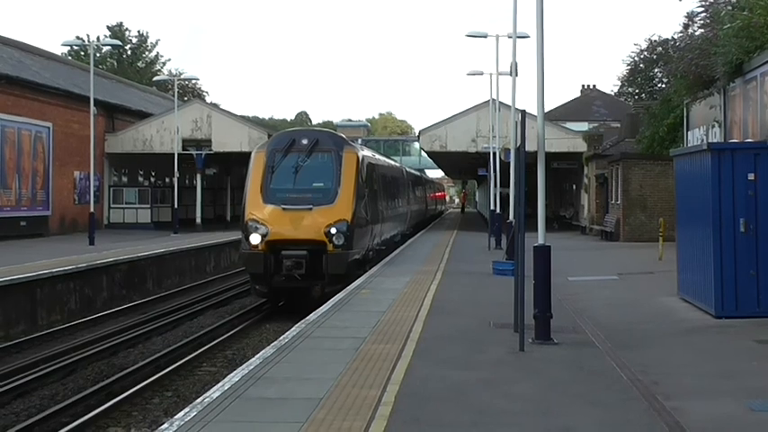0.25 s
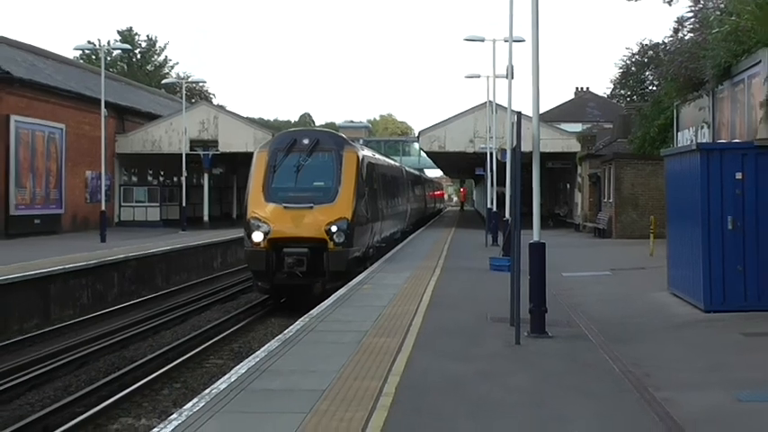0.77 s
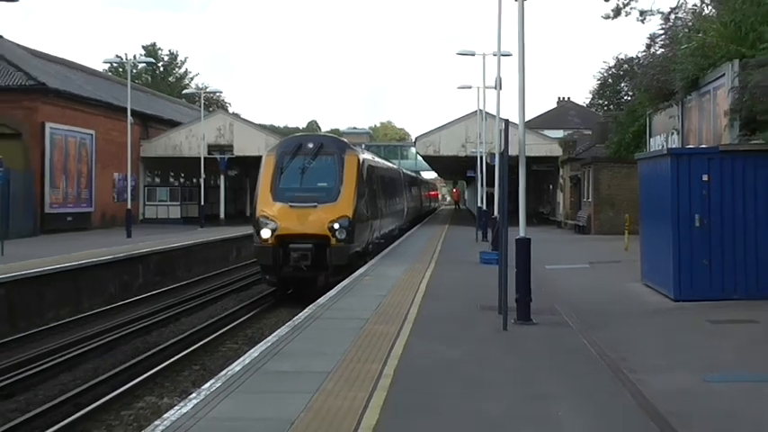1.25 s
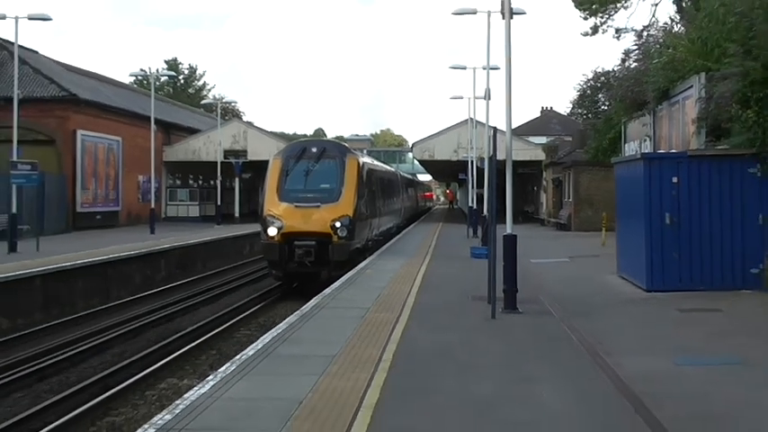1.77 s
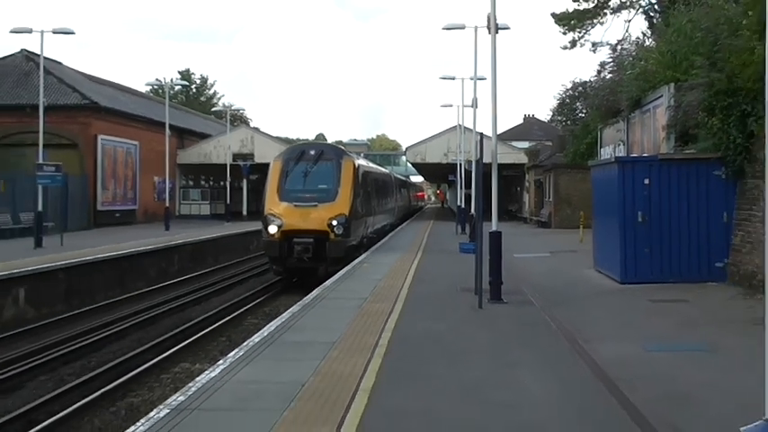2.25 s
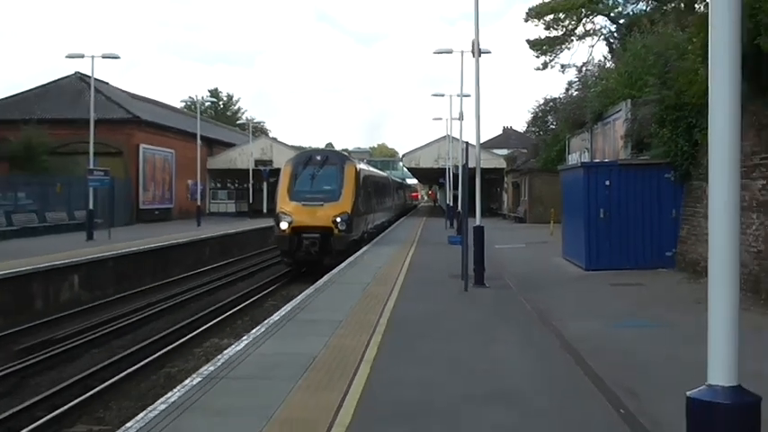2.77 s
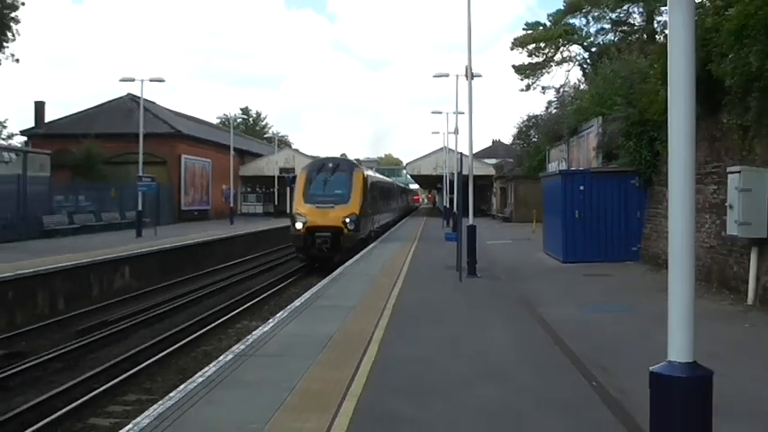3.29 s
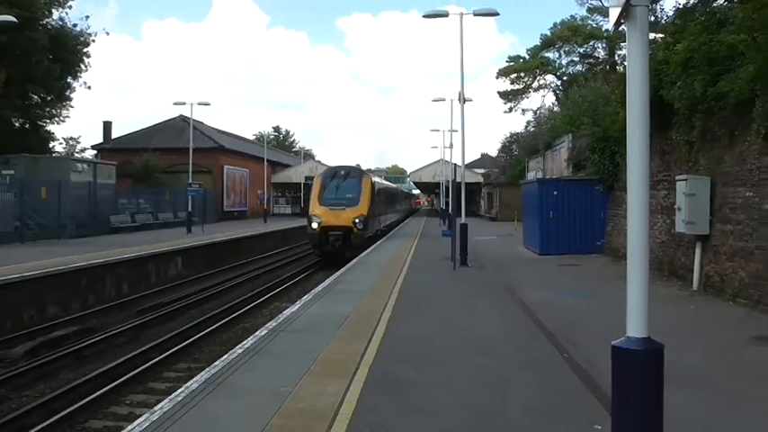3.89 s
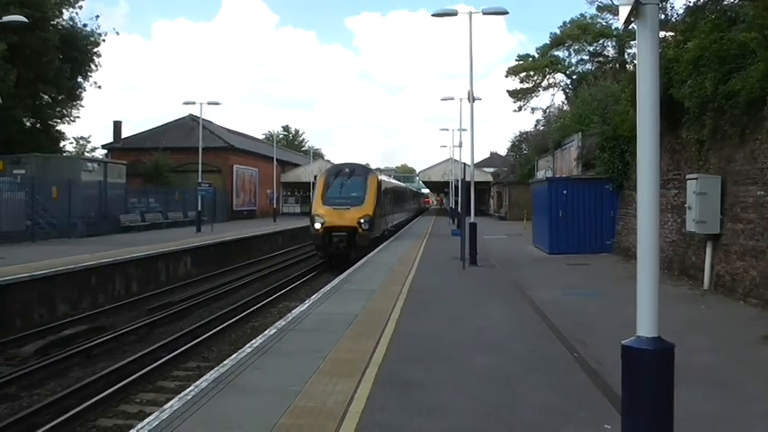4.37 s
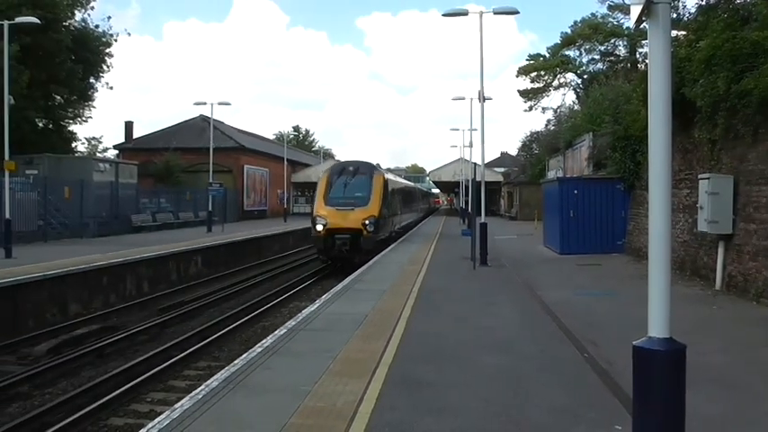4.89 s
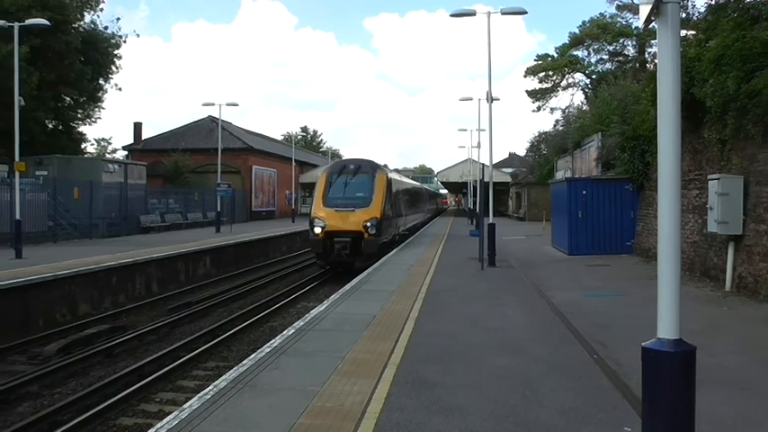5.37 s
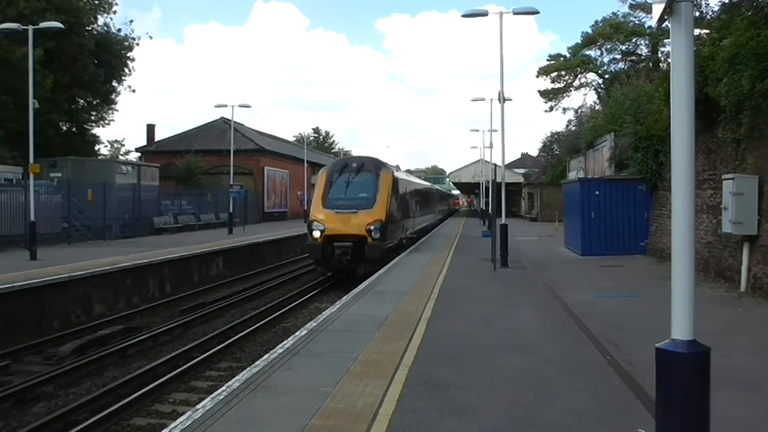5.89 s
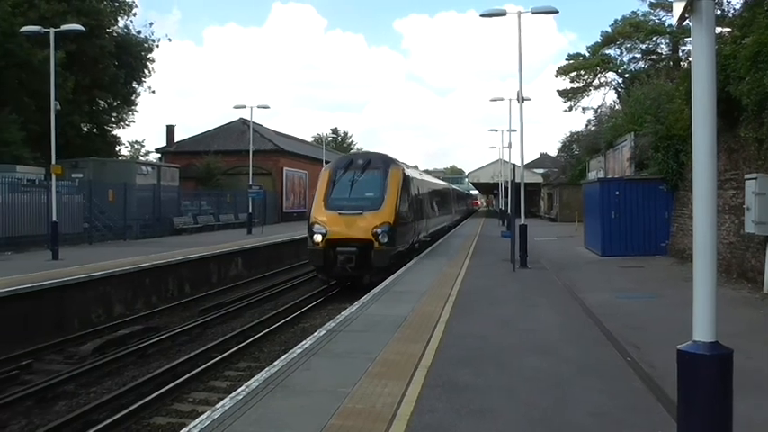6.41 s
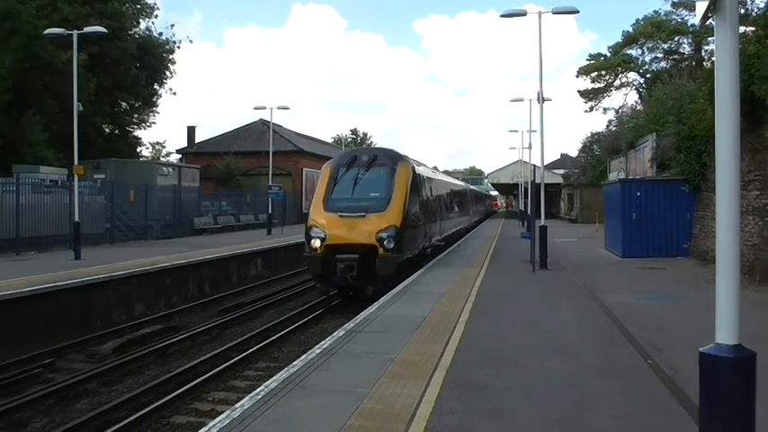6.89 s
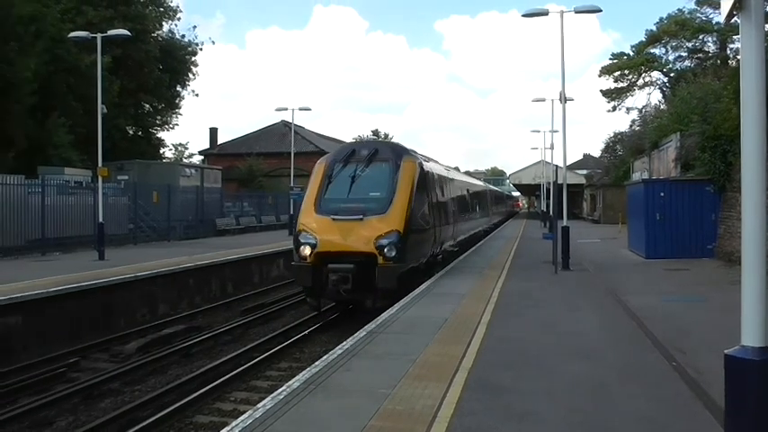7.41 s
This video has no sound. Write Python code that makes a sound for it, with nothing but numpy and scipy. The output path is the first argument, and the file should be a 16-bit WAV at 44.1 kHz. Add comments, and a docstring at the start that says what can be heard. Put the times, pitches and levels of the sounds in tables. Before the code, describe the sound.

Deep diesel engines accelerate steadily, their beating exhaust notes growing louder with thin rising turbocharger whine and fan noise as a train approaches along a platform.

```python
"""A diesel train pulls out of a station towards a listener on the platform.
From the start its six-cylinder engines speed up together, their exhaust notes swelling and cancelling, while
turbocharger compressors whistle upwards over fans, humming auxiliaries and wheels. Low swells pass after 2 s.
From about 3 s the roar grows, a second turbocharger whistle comes up and a small tick falls nearby. The gears
sing from 4 s, another tick follows after 5 s, and near the end the roar is loudest and the gears sing again."""
import sys
import numpy as np
from scipy import signal
from scipy.fft import rfft, irfft
from scipy.io import wavfile
from scipy.ndimage import uniform_filter1d

SR = 44100
rng = np.random.default_rng(int(sys.argv[2]) if len(sys.argv) > 2 else 0)


def wav_record(signal):
    """Record a signal, one row per channel, as 16-bit PCM in the file named by sys.argv[1]."""
    frames = np.transpose(np.atleast_2d(signal))
    bounded = np.clip(frames, -1, 1)
    # unit amplitude maps onto the largest positive 16-bit level
    quanta = np.round(bounded * 32767).astype(np.int16)
    wavfile.write(sys.argv[1], SR, quanta)


N = 337365  # samples, 7.65 s
T = np.arange(N) / SR  # time in seconds
F = np.maximum(np.arange(N // 2 + 1) * SR / N, 1)  # frequency grid in Hz


def undb(db):
    """Turn dB into a gain."""
    return 10 ** (np.asarray(db) / 20)


def columns(table):
    """Draw every column after the first as a line over time, sample by sample."""
    seconds, *rest = np.transpose(table)
    return [np.interp(T, seconds, column) for column in rest]


def over_hz(table):
    """Join (Hz, dB) points into a curve on the frequency grid, evenly in pitch."""
    hz, db = np.transpose(table)
    return np.interp(np.log(F), np.log(hz), db)


def walk(rate):
    """Smooth random wandering with spread 1; a higher rate (per second) wanders faster."""
    step = int(SR / rate)
    stairs = np.repeat(rng.standard_normal(N // step + 1), step)
    smooth = uniform_filter1d(uniform_filter1d(stairs, step), step)[:N]
    return smooth / smooth.std()


# How wide noise sounds. Each row: pitch in Hz, side signal minus middle signal in dB.
WIDTH = [(60, -7.5), (110, -14.5), (200, -25), (370, -19), (690, -11), (1260, -11.5), (2320, -9),
         (4270, -10), (7850, -10), (14400, 5)]


def spread(spectrum):
    """Steady noise of a given spectrum in two channels: a shared middle of rms 1 and an unrelated side."""
    mid, side = (spectrum * rfft(rng.standard_normal(N)) for _ in range(2))
    side = side * undb(over_hz(WIDTH))
    return irfft(np.array([mid + side, mid - side]), N) / np.sqrt(np.mean(spectrum ** 2))


def tone(hz, width_hz, firm=0):
    """A narrow line following hz, its middle near rms 1: firm is the steady share of power, the rest is noisy."""
    sway = [walk(width_hz) for _ in range(4)]
    turn = np.exp(2j * np.pi * np.cumsum(hz + 0 * T) / SR)
    mid = (np.sqrt(2 * firm) + np.sqrt(1 - firm) * (sway[0] + 1j * sway[1])) * turn
    side = 0.16 * (sway[2] + 1j * sway[3]) * turn  # a little different in each ear
    return np.real([mid + side, mid - side])


# The engines speed up. Each row: time in seconds, crank speed in Hz.
CRANK_SPEED = [(0.0, 18.91), (0.8, 20.34), (1.6, 21.86), (2.4, 23.65), (3.2, 24.84), (4.0, 25.67),
               (5.0, 26.82), (6.0, 27.66), (6.8, 28.07), (7.65, 28.47)]


def crank():
    """Crank speed in Hz and the angle turned so far in radians, which is the speed summed over time."""
    crank_hz = columns(CRANK_SPEED)[0]
    return crank_hz, 2 * np.pi * np.cumsum(crank_hz) / SR


# Small dry ticks nearby. Each row: start in seconds, level in dB before the filter, centre in Hz.
NEARBY_TICKS = [(3.246, -27, 8000), (5.1525, -27, 2600)]


def ticks():
    """Short dry bursts: noise that dies away within milliseconds, filtered to a band."""
    out = np.zeros(N)
    for start, db, hz in NEARBY_TICKS:
        decay = (T >= start) * np.exp(-np.maximum(T - start, 0) / 0.0013)
        burst = undb(db) * decay * rng.standard_normal(N)
        band = signal.butter(2, [hz / 1.8, hz * 1.6], "band", fs=SR, output="sos")
        out += signal.sosfilt(band, burst)
    return out


# Low swells. Each row: middle in seconds, pitch in Hz, peak level in dB, half length in seconds.
LOW_SWELLS = [(2.32, 50.3, -42, .1), (2.7, 56.3, -44, 0.23), (7.102, 55, -48, .08)]


def low_swells():
    """Short soft swells below the firing note: narrow noisy tones that rise and fall as a bell curve."""
    out = 0
    for middle, hz, db, half in LOW_SWELLS:
        out = out + undb(db) * np.exp(-((T - middle) / half) ** 2) * tone(hz, 7.1)
    return out


# A low hum comes and goes. Each row: time in seconds, level in dB.
LOW_HUM_LEVEL = [(0, -44), (.45, -43), (.6, -54), (.87, -45), (1.3, -42), (1.55, -50), (2.1, -47),
                 (2.45, -39), (2.6, -47), (2.79, -40), (2.95, -50), (3.5, -45), (5, -44), (7.3, -44),
                 (7.55, -37), (7.65, -39)]
# Auxiliaries. Each row: pitch in Hz, width in Hz, level in dB at the start, level in dB at the end.
AUXILIARY_HUMS = [(848, 28, -46.5, -55), (1040, 110, -48, -58), (1680, 35, -49, -51), (1728, 45, -49, -51),
                  (3390, 90, -63, -65), (4645, 40, -66, -66), (5420, 110, -62, -61)]
HUM_DRIFT = .012  # typical wavering as a share of the pitch, for the hums that waver


def hums():
    """Auxiliaries hum as narrow noisy lines: the low hum and those above 2000 Hz hold pitch, the others waver."""
    out = undb(columns(LOW_HUM_LEVEL)[0]) * tone(383.5, 10, firm=0.35)
    for hz, width_hz, db, end_db in AUXILIARY_HUMS:
        level = undb(np.linspace(db, end_db, N) + .6 * walk(5))
        drift = 1 + HUM_DRIFT * (hz < 2000) * walk(4)
        out += level * tone(hz * drift, width_hz)
    return out


# How loud the gears sing. Each row: time in seconds, level in dB.
GEAR_LEVEL = [(0, -64), (2.4, -60), (3.7, -55), (4, -43), (4.25, -49), (4.55, -43), (4.8, -47), (5.05, -58),
              (6.8, -56), (7.3, -47), (7.65, -48)]
# Gear meshes. Each row: teeth met per crank turn, width in Hz, dB added to the gear level.
GEAR_MESHES = [(41.7, 20, 0), (55.6, 30, -6)]


def gears(crank_hz):
    """Gears sing at the rate their teeth meet, so the pitch climbs with the crank."""
    out = 0
    for teeth, width_hz, db in GEAR_MESHES:
        out = out + undb(db) * tone(teeth * crank_hz, width_hz, firm=.55)
    return out * undb(columns(GEAR_LEVEL)[0])


# Turbochargers. Each row: time in seconds, compressor blade rate in Hz, compressor dB, turbine dB.
TURBOCHARGER = [(0, 4230, -58, -82), (.2, 4330, -59, -80), (.55, 4540, -55, -80), (.75, 4640, -58, -80),
                (.92, 4720, -53, -80), (1.3, 5000, -63, -80), (1.9, 5550, -64, -80),
                (2.15, 5770, -57.5, -80), (2.45, 6010, -56.5, -80), (3, 6420, -62, -76),
                (3.4, 6700, -57.5, -70), (3.8, 6960, -58.5, -55), (4.15, 7180, -55.5, -52.5),
                (4.5, 7360, -58.5, -55), (4.7, 7470, -59, -49), (5.05, 7660, -64, -52),
                (5.3, 7780, -67, -56), (5.8, 7980, -67, -50.5), (6.1, 8090, -64, -52),
                (6.3, 8170, -62, -55), (7.2, 8500, -60, -57), (7.65, 8644, -60, -56)]
TURBINE_SHARE = .618  # turbine blades per compressor blade


def turbochargers():
    """Compressor and turbine blades share a shaft and whistle at the rates their blades pass."""
    blade_hz, compressor_db, turbine_db = columns(TURBOCHARGER)
    out = undb(compressor_db + 2 * walk(10)) * tone(blade_hz, 330)
    return out + undb(turbine_db + 1.5 * walk(10)) * tone(TURBINE_SHARE * blade_hz, 190)


# Colour of the broad noise. Each row: pitch in Hz, relative dB per Hz.
ROAR_COLOUR = [(160, -22), (280, -7), (309, -2.5), (461, -2.5), (560, -8.5), (680, -10.5), (839, -7),
               (958, -11), (1270, -11.5), (1710, -11.5), (1860, -16), (2470, -25.5), (4100, -25.5),
               (5000, -25), (7400, -34), (7900, -37), (8500, -33), (9200, -35), (11500, -52.5),
               (13300, -54.5), (14900, -65)]


def broad_noise(growl_db, hiss_db):
    """Noise of engines, wheels and air in half-octave bands that flicker: growl low down, air hiss high up."""
    colour = undb(over_hz(ROAR_COLOUR))
    colour = colour / np.sqrt(np.mean(colour ** 2 * (F > 500) * (F < 2500)))
    out = 0
    for hz in 280 * 2 ** np.arange(0, 6, .5):
        band = colour * np.cos(np.pi / 2 * np.clip(2 * np.log2(F / hz), -1, 1))
        low = np.clip(np.log2(900 / hz), 0, 1)  # share of growl
        high = np.clip(np.log2(hz / 3000), 0, 1)  # share of hiss
        db = -1.0 + low * (growl_db + 0.74 * walk(7.6)) + high * hiss_db
        db = db + (.5 + .5 * high) * walk(9)
        out = out + undb(db) * np.sqrt(np.mean(band ** 2)) * spread(band)
    return out


# Cooling fans. Each row: centre in Hz, width in Hz, dB added to the fan level.
COOLING_FANS = [(818, 137, -5), (1684, 240, -1.5), (2180, 310, -8), (3260, 770, -9.5)]


def fans(low_fan_db, upper_fan_db):
    """Cooling fans roar as humps of noise whose levels waver."""
    out = 0
    for hz, width_hz, db in COOLING_FANS:
        fan_db = low_fan_db if hz < 1000 else upper_fan_db
        hump = 1 / (1 + (2 * (F - hz) / width_hz) ** 4)
        out = out + undb(fan_db + db + 0.89 * walk(6)) * spread(hump)
    return out


# Colour of the exhaust gas, for the rumble and some notes. Each row: pitch in Hz, relative dB per Hz.
GAS_COLOUR = [(25, -29.5), (60, -18.5), (100, -15.5), (140, -9), (200, -3), (260, -7), (300, -21)]
# Rumble of exhaust gas. Each row: time in seconds, dB above the roar.
RUMBLE_LEVEL = [(0, 0), (1.3, 1), (2.3, 5), (3, 6), (4.5, 4), (5.1, 1.5), (5.8, 1), (7.65, 3.5)]


def rumble(crank_angle):
    """Exhaust gas rumbles as low noise that throbs gently, about once per crank turn."""
    throb = 1 + 0.14 * np.cos(crank_angle + 2.6 * walk(3))
    level = undb(columns(RUMBLE_LEVEL)[0] + 1.0 * walk(3.14))
    return throb * level * spread(undb(over_hz(GAS_COLOUR)) * (F < 330))


# The approach. Each row: time in seconds, overall roar in dB, then four levels in dB against that roar:
# growl, air hiss, low fan band, upper fan bands.
ROAR_LEVELS = [(0, -36.5, 0.5, 0.93, -4, -10), (.7, -35.5, -0.5, 0.88, -3.5, -9.5),
               (1.3, -36, 0, 1.8, -8, -10), (2.3, -35, 1.5, 3.4, -2.5, -9), (3, -34, -0.8, 3.5, -6, -12),
               (3.6, -34, 1.3, 3.5, -10, -8.5), (4.5, -31.5, -0.48, 3.5, -15, -10.5),
               (5.1, -30.5, 0, 1, -18, -10), (5.8, -29, 1.2, 0.65, -8, -14),
               (6.6, -29, 0.9, 1.1, -4.5, -11), (7.65, -27, 1.5, 2.5, -8, -8.5)]
PAN_DB = 1  # the roar is louder on the left


def roar(crank_angle):
    """Broad noise, fans and gas rumble share one overall level that follows the approach."""
    roar_db, growl_db, hiss_db, low_fan_db, upper_fan_db = columns(ROAR_LEVELS)
    out = broad_noise(growl_db, hiss_db) + fans(low_fan_db, upper_fan_db) + rumble(crank_angle)
    return out * undb(roar_db + np.array([[PAN_DB], [-PAN_DB]]) / 2)


# The engines cancel each other on one note. Each row: middle in seconds, crank order, half length in seconds.
CANCELLATIONS = [(0.407, 8, 0.13), (0.88, 12, 0.093), (0.928, 10, 0.08), (1.544, 9, 0.12), (1.55, 8, 0.087),
                 (1.613, 12, 0.11), (1.87, 3, 0.4), (2.28, 8, 0.074), (2.328, 6, 0.17), (2.422, 6, 0.08),
                 (1.944, 9, 0.05), (2.503, 3, 0.24), (2.572, 9, 0.07), (3.017, 10, 0.064), (3.2, 9, 0.063),
                 (3.564, 6, 0.085), (3.812, 8, 0.33), (4.37, 9, 0.054), (5.738, 8, 0.048), (5.802, 9, 0.21),
                 (5.958, 6, 0.028), (6.148, 3, 0.21), (6.57, 9, 0.13), (6.696, 3, 0.092), (6.77, 9, 0.045),
                 (7.178, 3, 0.077), (7.236, 9, 0.14)]
CANCEL_LEAK = 0.065  # share of the note that survives


def cancelled(order):
    """Gain of one note, dipping around the moments where the engines oppose each other."""
    gain = 1
    for middle, dipped_order, half in CANCELLATIONS:
        if round(dipped_order) == order:
            away = (T - middle) ** 2
            gain = gain * np.sqrt((away + (CANCEL_LEAK * half) ** 2) / (away + half ** 2))
    return gain


# An exhaust note of order n sounds at n times the crank speed.
# Strong notes swell as the cars fall in and out of step. Each row: time in seconds, level in dB before dips.
ORDER_3 = [(0.0, -43), (0.39, -35), (3.43, -25), (3.829, -29.5), (4.27, -26), (4.8, -25.5), (5.09, -26),
           (5.44, -36), (6.69, -32.5), (7.65, -35.5)]
ORDER_6 = [(0, -36.5), (.5, -29.5), (1.3, -30.5), (1.65, -22.5), (1.93, -27), (2.13, -16), (2.8, -18.5),
           (3.15, -32.5), (3.38, -24.5), (3.72, -18), (4.09, -12.5), (4.3, -17.5), (4.72, -14), (5.2, -17),
           (5.4, -22), (5.8, -21), (5.98, -30), (6.22, -21.5), (6.5, -18), (6.91, -13), (7.2, -15),
           (7.39, -12), (7.65, -16)]
ORDER_8 = [(0, -42), (.35, -33), (.67, -30), (1.3, -34.5), (1.9, -44), (2.15, -25), (2.45, -32),
           (2.65, -36), (2.85, -30), (3.05, -32.5), (3.45, -22), (4.2, -22), (4.55, -20.5), (4.85, -25),
           (5.15, -31), (5.3, -39), (5.5, -29.5), (6, -28), (6.35, -29), (6.8, -33), (7.25, -26),
           (7.65, -30)]
ORDER_9 = [(0, -39), (.2, -34), (.45, -30.5), (.8, -30), (1.19, -23), (1.77, -23), (1.94, -24),
           (2.17, -17.5), (2.28, -29), (2.4, -23.5), (2.8, -21), (2.99, -37), (3.8, -31), (4.5, -24.5),
           (4.84, -26), (5.28, -19.5), (6, -22.5), (6.25, -18), (6.76, -21), (6.9, -22.5), (7.65, -23)]
# Weak notes, which also swell at random. Each row: time in seconds, level in dB before swells and dips.
ORDER_5 = [(0, -58), (1.9, -61), (2.15, -46), (2.5, -52), (2.75, -47), (3.2, -37), (3.5, -49), (3.68, -50),
           (3.95, -38), (4.25, -41), (4.6, -39), (4.9, -46), (5.22, -48), (5.45, -32), (5.9, -34),
           (6.2, -39), (6.35, -33), (6.65, -31.5), (7.05, -30.5), (7.4, -26.5), (7.65, -30)]
ORDER_7 = [(0, -52), (.65, -41), (.95, -48), (1.2, -37), (1.6, -50), (2.2, -50), (3, -48), (3.6, -51),
           (3.8, -49), (4.25, -40), (4.55, -35), (4.95, -54), (5.3, -33), (6, -37), (6.22, -38), (6.4, -31),
           (6.65, -26), (6.78, -35), (6.92, -24), (7.2, -38), (7.65, -40)]
ORDER_10 = [(0, -37), (.75, -33.5), (1.2, -38), (1.7, -37), (2.1, -54), (2.45, -37), (2.9, -40),
            (3.25, -27.5), (3.65, -38), (3.85, -31), (4.35, -36), (4.8, -33), (5.2, -48), (6, -47),
            (7.65, -47)]
# Orders 11 and 12 climb through the silencer. Each row: pitch in Hz, dB added to the note.
SILENCER_CURVE = [(190, -14), (225, -11.5), (238, -10), (255, 0.5), (265, -8.5), (275, -19), (290, -20),
                  (345, -21)]
# Every second turn is stronger, which sounds half orders; order 4 shares their level.
# Each row: time in seconds, level in dB before the gas colour is added.
HALF_ORDERS = [(0, -44), (1.4, -44), (2.2, -47), (4, -43), (6, -41), (7.65, -37)]
# Growl of orders 13 to 21, firmer under load. Each row: time in seconds, level of each in dB before swells.
UPPER_ORDERS = [(0, -58), (2, -55), (3, -52), (4.5, -50), (6, -49), (7.65, -47)]


def exhaust_levels(crank_hz):
    """Pairs of crank order and level in dB; pipe and silencer colour some notes by the pitch they have reached."""
    notes = []
    for order, table in ((3, ORDER_3), (6, ORDER_6), (8, ORDER_8), (9, ORDER_9)):
        notes.append((order, columns(table)[0]))
    for order, table in ((5, ORDER_5), (7, ORDER_7), (10, ORDER_10)):
        notes.append((order, columns(table)[0] + 1 * walk(5)))
    for order, db in ((11, -31), (12, -25)):
        silencer_db = np.interp(order * crank_hz, *np.transpose(SILENCER_CURVE))
        notes.append((order, db + silencer_db + 1.5 * walk(10)))
    hz, colour_db = np.transpose(GAS_COLOUR)
    for order in (4, 4.5, 5.5, 6.5, 7.5, 8.5, 9.5, 10.5, 11.5):
        pipe_db = np.interp(np.log(order * crank_hz), np.log(hz), colour_db)
        notes.append((order, columns(HALF_ORDERS)[0] + pipe_db + 3 * walk(3)))
    for order in range(13, 22):
        notes.append((order, columns(UPPER_ORDERS)[0] + 3 * walk(8)))
    return notes


def exhaust(crank_hz, crank_angle):
    """Clean crank orders, nearly in step so each turn is a beat; walls shift them a little between the ears."""
    out = 0
    for order, db in exhaust_levels(crank_hz):
        phase = order * crank_angle + (.15 + order / 25) * walk(1.5) + .1 * walk(8)
        ear_shift = (0.011 + 0.0015 * order) * walk(1.47) * np.array([[1], [-1]])
        level = np.sqrt(2) * cancelled(order) * undb(db + 0.64 * walk(12))
        out = out + level * np.cos(phase + ear_shift)
    return out


def scene():
    """Everything added up as it reaches the platform, with one crank driving exhaust, rumble and gears."""
    crank_hz, crank_angle = crank()
    background = ticks() + low_swells() + hums()
    machinery = gears(crank_hz) + turbochargers() + roar(crank_angle)
    return background + machinery + exhaust(crank_hz, crank_angle)


# The microphone pair. Each row: pitch in Hz, left minus right in dB.
MICROPHONE_LEAN = [(60, -0.4), (110, -0.5), (200, -1.2), (370, -1.5), (690, -1.5), (1260, 0), (2320, 1),
                   (4270, -1.2), (7850, -2.5), (14400, -1.5)]
SELF_NOISE_DB, TOP_HZ = -66.5, 15050  # hiss before the top is cut, and where it is cut


def record(dry):
    """The two microphones differ a little in colour and hiss faintly on their own; the top is cut."""
    lean = over_hz(MICROPHONE_LEAN) / 2
    response = irfft(undb([lean, -lean]), N)
    taps = np.roll(response, 256, axis=1)[:, :513] * np.hanning(513)  # centred short filter
    pair = signal.fftconvolve(dry, taps, "same", axes=1)
    pair = pair + undb(SELF_NOISE_DB) * rng.standard_normal((2, N))
    return signal.sosfilt(signal.ellip(12, .2, 80, TOP_HZ, fs=SR, output="sos"), pair)


dry = scene()
out = record(dry)
wav_record(out)
```